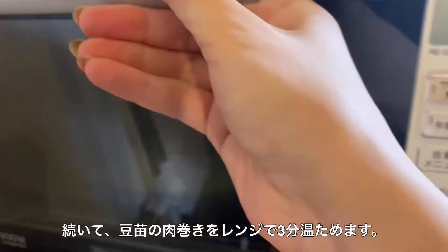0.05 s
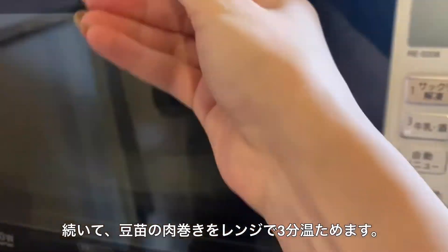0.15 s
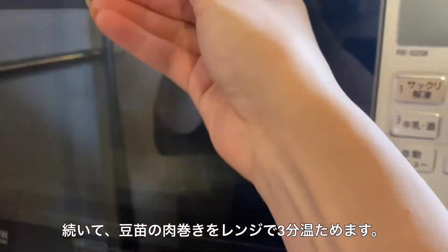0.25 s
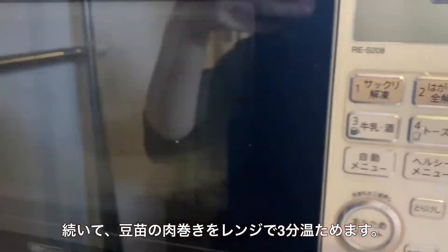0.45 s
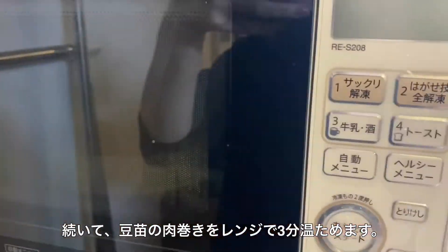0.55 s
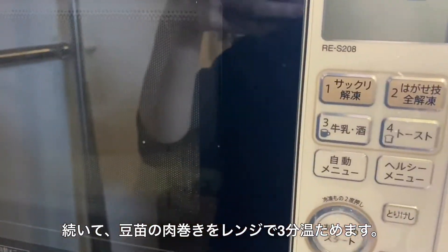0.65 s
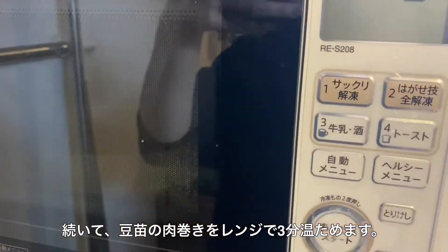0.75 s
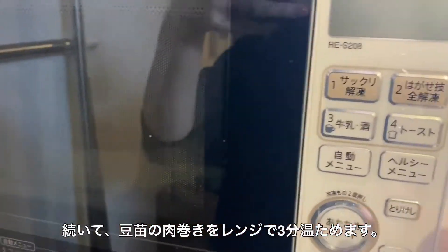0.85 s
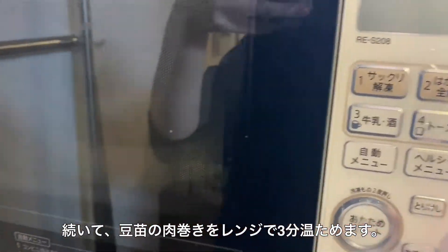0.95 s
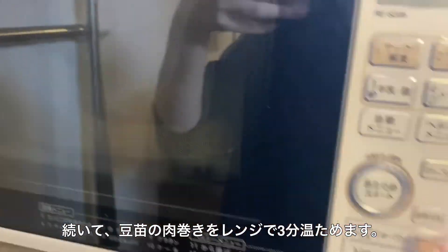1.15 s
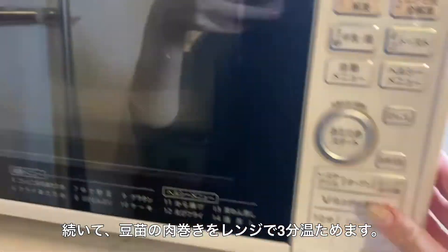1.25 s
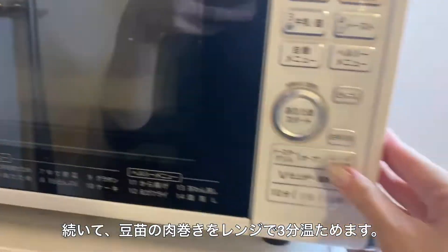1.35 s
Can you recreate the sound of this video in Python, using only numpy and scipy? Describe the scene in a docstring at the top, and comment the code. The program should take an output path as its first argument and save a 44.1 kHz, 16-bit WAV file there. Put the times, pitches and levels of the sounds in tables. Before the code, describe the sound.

Close thunk of a microwave door pushed shut, latch clicking, over faint kitchen hum.

```python
"""First come a steady room hum, the low rumble of a hand-held microphone and faint handling ticks.
Then a microwave oven door is pushed shut, close by, in the quiet kitchen. The latch hooks click
over their catches; about 40 ms later the door lands on its frame and the steel case booms briefly.
A short echo fades, leaving the hum, the rumble and two soft brushes of the hand."""
import sys
import numpy as np
from scipy import signal
from scipy.fft import rfft, irfft
from scipy.io import wavfile

SR = 44100
rng = np.random.default_rng(int(sys.argv[2]) if len(sys.argv) > 2 else 0)


def pcm_store(signal):
    """Save signal as 16-bit PCM."""
    levels = np.round(np.clip(np.atleast_2d(signal), -1, 1) * 32767)
    wavfile.write(sys.argv[1], SR, levels.astype(np.int16).T)


N = 61739
TIME = np.arange(N) / SR
FREQUENCIES = np.arange(N // 2 + 1) * SR / N

# Levels in the tables are relative. A fade time is how long a sound takes to drop by 60 dB.
# how alike the two ears hear the noises: (frequency [Hz], correlation [1 = the same])
EAR_LIKENESS = [(60, 0.82), (180, 0.31), (350, 0.83), (700, 0.27), (1500, 0.13), (5000, 0.22),
                (15000, 0.46)]
# tone of the room hum: (frequency [Hz], level [dB])
HUM_TONE = [(35, -38), (60, -16.5), (76, -2.5), (98, -2.5), (124, -4), (164, -10), (189, -7), (217, -12),
            (244, -10.5), (294, -16.5), (323, -13), (389, -19), (417, -10), (515, -15.5), (666, -9.5),
            (785, -19), (1060, -16.5), (1510, -23), (2650, -24.5), (3500, -30.5), (4420, -34.5),
            (5460, -41.5), (6140, -38), (7400, -57.5), (16000, -68)]
# tone of the room's echo: (frequency [Hz], level [dB])
ECHO_TONE = [(60, -22), (200, -12.5), (1000, 7), (5000, 0), (9000, 1.5), (15000, -4)]
# tone of the microphone rumble: (frequency [Hz], level [dB])
RUMBLE_TONE = [(15, -5), (29, -2), (45, -4.5), (70, -32), (115, -9.5), (200, -30), (600, -80)]
# how the rumble rises and falls: (time [s], level [dB])
RUMBLE_LEVELS = [(0, -60), (0.08, -45.5), (0.43, -47.5), (0.52, -68.5), (0.62, -49.5), (0.78, -47.5),
                 (1.1, -48), (1.18, -42), (1.25, -43), (1.35, -55)]
# faint handling ticks: (time [s], level [dB])
TICK_HITS = [(0.0215, 2), (0.143, -15)]
# tone of the ticks: (frequency [Hz], level [dB])
TICK_TONE = [(300, 2.5), (700, 12), (1100, 6.5), (1600, 1.5), (2500, -30), (5000, -9.5), (8000, -28),
             (15000, -35)]
# soft brushes of the hand: (time [s], length [s], level [dB])
BRUSH_STROKES = [(0.141, 0.0093, -69), (1.072, 0.027, -80), (1.129, .08, -77.5)]
# tone of the brushes: (frequency [Hz], level [dB])
BRUSH_TONE = [(1000, -7.5), (6000, 4), (11000, -5.5), (15500, -3)]
# the hooks strike and ride over their catches: (time [s], level [dB])
LATCH_HITS = [(0.1668, -6.5), (0.1696, 0.5), (0.1752, -13), (0.1825, -7)]
# ringing notes of the latch: (frequency [Hz], level [dB], fade time [s])
LATCH_NOTES = [(863, -37, 0.1), (932, -36, 0.068), (1049, -39, 0.076), (1340, -34, 0.035),
               (2210, -38.5, 0.16), (2320, -39.5, 0.21), (2550, -34, 0.11), (2700, -42, .06),
               (4027, -34, 0.045), (4020, -40.5, 0.016), (5080, -38, 0.029), (5242, -37, 0.059)]
# tone of the latch's plastic clatter: (frequency [Hz], level [dB])
LATCH_TONE = [(120, 2.5), (220, 7), (400, -20), (700, 4.5), (900, 6), (1300, 4), (1850, -1.5), (2200, 1.5),
              (2600, -4), (3100, -2), (3600, -5.5), (4000, 4.5), (4600, -6.5), (5300, -6), (6200, -4),
              (8000, -12.5), (12500, -19.5), (15500, -16)]
# low notes of the steel case and the air inside: (frequency [Hz], level [dB], fade time [s])
CASE_NOTES = [(33.6, -37, 0.28), (77.5, -16, .21), (108.9, -12.5, 0.13), (124.5, -29, 0.11),
              (163.5, -18, 0.074), (213, -18, 0.14), (249, -23.5, 0.147), (314, -28.5, .19),
              (429, -25.5, .17), (456, -27, 0.34), (493, -13, 0.056), (538, -23, 0.21)]
# the door meets its frame and settles: (time [s], level [dB])
DOOR_HITS = [(0.2018, 1), (0.2055, 0), (0.2082, -0.5), (0.2135, -13), (0.2215, -29.5)]
# tone of the dense ringing of door and panels: (frequency [Hz], level [dB])
DOOR_TONE = [(100, -21), (280, 5.5), (380, -3.5), (520, 2.5), (700, -6.5), (900, -2), (1550, 1),
             (1850, -11.5), (2500, -6), (3500, -15.5), (6000, -22.5), (8000, -28.5), (12500, -27.5),
             (15500, -29)]
# how long that ringing lasts in each band: (frequency [Hz], fade time [s])
DOOR_FADES = [(100, 0.12), (500, 0.22), (1500, 0.062), (5000, 0.12), (15000, 0.061)]
# clearest notes of the door panel: (frequency [Hz], level [dB], fade time [s])
PANEL_NOTES = [(351.4, -44.5, 0.18), (576.4, -44.5, 0.17), (799, -48.5, .15), (890, -36, 0.095),
               (1035, -50, 0.17), (1216, -50, 0.089), (1410, -47.5, 0.11), (1660, -43.5, 0.15)]

CUTOFF_HZ = 15850


def from_db(db):
    """Turn decibels into a number to multiply a sound by."""
    return 10 ** (np.asarray(db) / 20)


def curve(points):
    """Join a table's points into a value for every frequency, on a log-frequency axis."""
    hz, values = np.transpose(points)
    return np.interp(np.log(np.maximum(FREQUENCIES, 1)), np.log(hz), values)


def noise(tone):
    """Stereo noise with the given tone, partly alike in both ears, scaled to a strength (rms) of 1."""
    alike = curve(EAR_LIKENESS)
    shared, opposite = rfft(rng.standard_normal((2, N)))
    ears = np.sqrt(1 + alike) * shared + np.sqrt(1 - alike) * opposite * [[1], [-1]]
    gain = from_db(curve(tone)) * (FREQUENCIES > 10) * (FREQUENCIES < CUTOFF_HZ)
    sound = irfft(gain * ears, N)
    return sound / sound.std()


def fading(hits, fade_s):
    """Loudness over time of hits whose energies add up and die away."""
    energy = sum((TIME >= start) * from_db(db - 60 * np.abs(TIME - start) / fade_s) ** 2
                 for start, db in hits)
    return np.sqrt(energy)


def ring(start, hz, fade_s):
    """One struck note: a sine wave that dies away."""
    age = np.maximum(TIME - start, 0)
    return np.sin(2 * np.pi * hz * age) * np.exp(-np.log(1000) * age / fade_s)


def struck(hits, notes, max_lag_s=0.00021, spread_db=1.2):
    """Every hit rings every note, with a slightly random delay and strength in each ear."""
    sound = 0
    for start, hit_db in hits:
        for k, (hz, note_db, fade_s) in enumerate(notes):
            lag = max_lag_s * rng.random((2, 1))
            strength = from_db(hit_db + note_db + spread_db * rng.standard_normal((2, 1)))
            direction = (-1) ** k  # neighbouring notes swing opposite ways
            sound = sound + direction * strength * ring(start + lag, hz, fade_s)
    return sound


def pan(left_db):
    """Left and right gains; a positive value makes the left ear louder."""
    return from_db(np.array([[left_db], [-left_db]]) / 2)


def room_hum(level_db=-49.5, lag_s=0.00043):
    """A steady hum comes from the right, so it reaches the left ear a little later."""
    left, right = from_db(level_db) * noise(HUM_TONE)
    return np.array([np.roll(left, round(lag_s * SR)), right])


def kitchen_echo(sound, level_db=-18.5, delay_s=0.008):
    """The small room throws the sound back as a short, smooth echo."""
    tail = noise(ECHO_TONE) * fading([(delay_s, 0)], fade_s=0.23)
    tail = tail / np.sqrt(np.sum(tail ** 2) / 2)
    return from_db(level_db) * signal.fftconvolve(sound, tail, axes=1)[:, :N]


def handling(tick_db=-40):
    """The hand holding the microphone makes small ticks, brushes of skin and a low rumble."""
    ticks = from_db(tick_db) * fading(TICK_HITS, fade_s=0.034) * noise(TICK_TONE)
    rumble_db = np.interp(TIME, *np.transpose(RUMBLE_LEVELS))
    rumble = from_db(rumble_db) * noise(RUMBLE_TONE)
    strokes = sum(from_db(db) * np.sin(np.pi * np.clip((TIME - start) / length, 0, 1))
                  for start, length, db in BRUSH_STROKES)
    return ticks + strokes * noise(BRUSH_TONE) + rumble


def latch(clatter_db=-35.5, crack_above_clatter_db=7.5):
    """Hooks snap over their catches: a sharp crack, a short plastic clatter and ringing notes."""
    clatter = fading(LATCH_HITS, fade_s=0.15)
    crack = from_db(crack_above_clatter_db) * fading(LATCH_HITS, fade_s=0.0091)
    clicks = from_db(clatter_db) * np.hypot(clatter, crack) * noise(LATCH_TONE)
    return (clicks + struck(LATCH_HITS, LATCH_NOTES)) * pan(left_db=-1.8)


def case_boom(start=0.2048, push_s=0.0029, dent_s=0.0054, dent_lead_s=0.0006, gain_db=0.5):
    """The door's cushioned blow bends the steel case in for an instant and sets its low notes booming."""
    notes = sum(from_db(db) * ring(start, hz, fade_s) for hz, db, fade_s in CASE_NOTES)
    push = np.sin(np.pi * np.minimum(TIME / push_s, 1)) ** 2
    boom = signal.fftconvolve(notes, push / push.sum())[:N]  # a soft push weakens the higher notes
    dent_progress = np.clip((TIME - start + dent_lead_s) / dent_s, 0, 1)
    dent = from_db(-8) * np.sin(np.pi * dent_progress) ** 2
    return from_db(gain_db) * (boom - dent) * pan(left_db=1.3)


def door(ringing_db=-28):
    """The door lands in a quick run of hits; its panels ring, each band fading at its own pace."""
    spectrum = rfft(noise(DOOR_TONE))
    centres_hz, fades_s = np.transpose(DOOR_FADES)
    ringing = 0
    for share, fade_s in zip(np.eye(len(centres_hz)), fades_s):
        band = irfft(spectrum * curve(np.c_[centres_hz, share]), N)  # the noise around one centre
        ringing = ringing + band * fading(DOOR_HITS, fade_s)
    return from_db(ringing_db) * ringing + struck(DOOR_HITS, PANEL_NOTES)


def scene():
    """The oven door shuts and echoes, over the handling sounds and the hum."""
    oven = latch() + door() + case_boom()
    return oven + kitchen_echo(oven) + handling() + room_hum()


def record(dry):
    """A steep filter removes the very highest treble."""
    low_pass = signal.firwin(401, CUTOFF_HZ, fs=SR)
    return signal.fftconvolve(dry, low_pass[None], "same", axes=1)


dry = scene()
out = record(dry)
pcm_store(out)
```